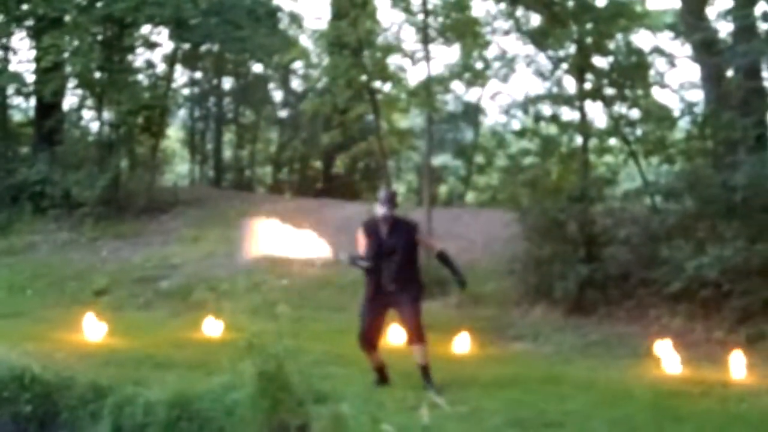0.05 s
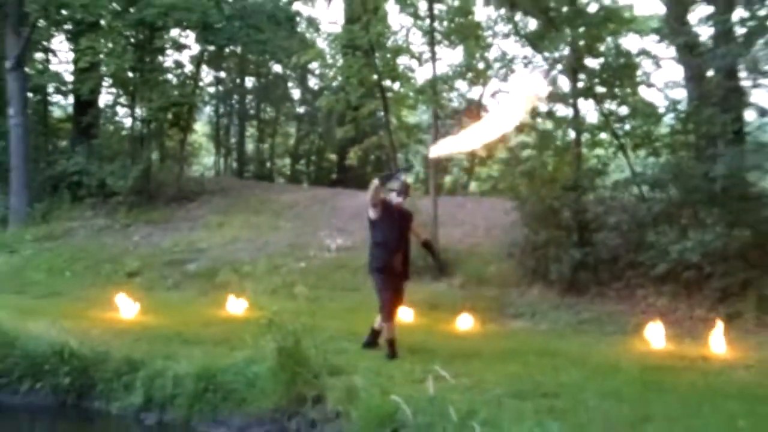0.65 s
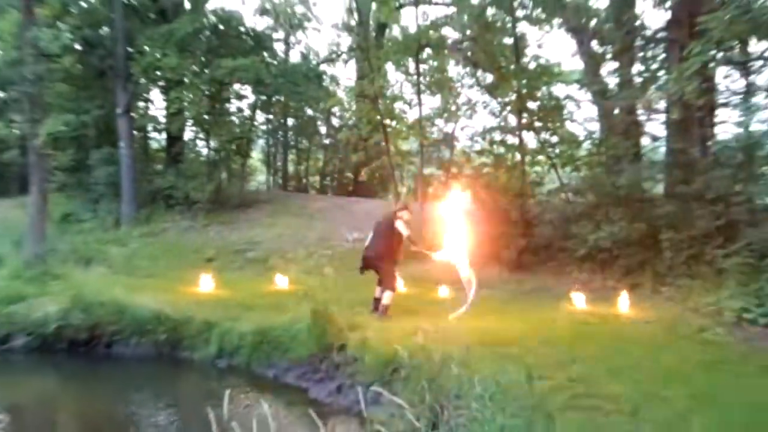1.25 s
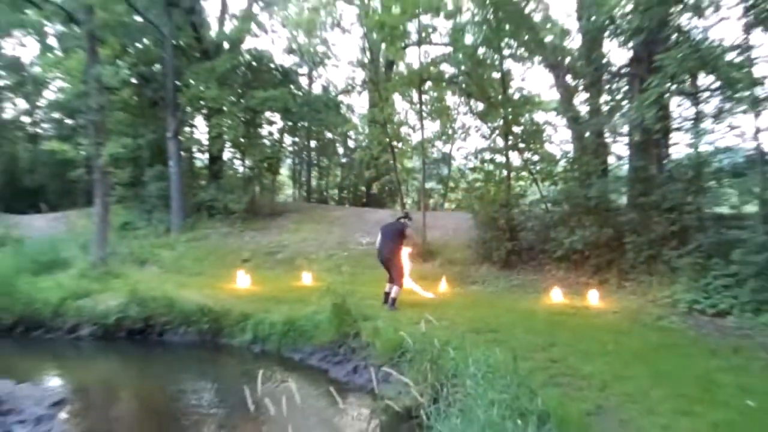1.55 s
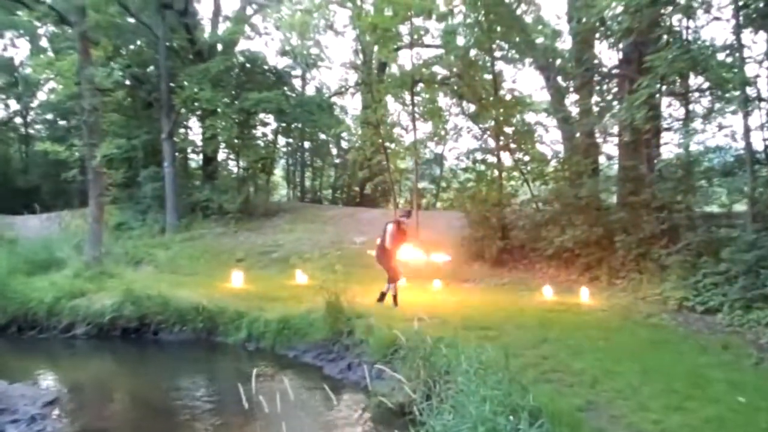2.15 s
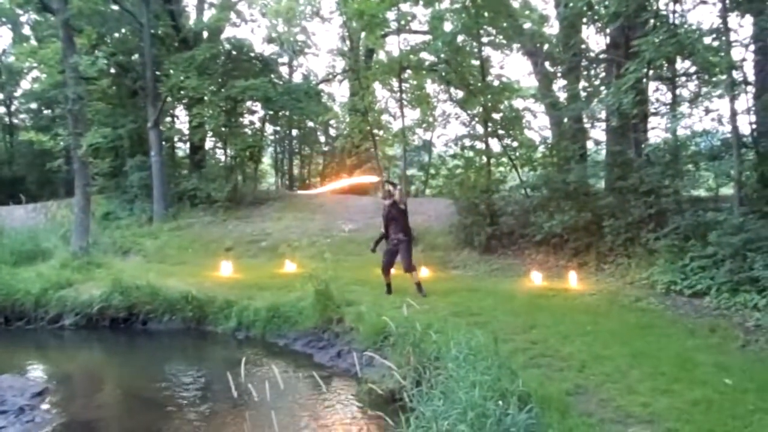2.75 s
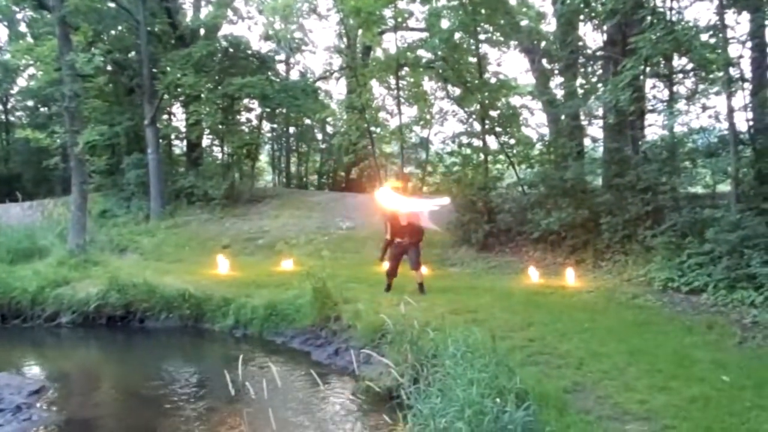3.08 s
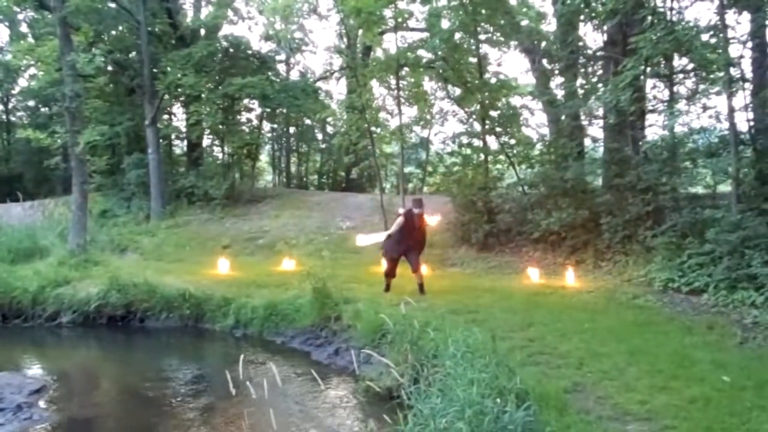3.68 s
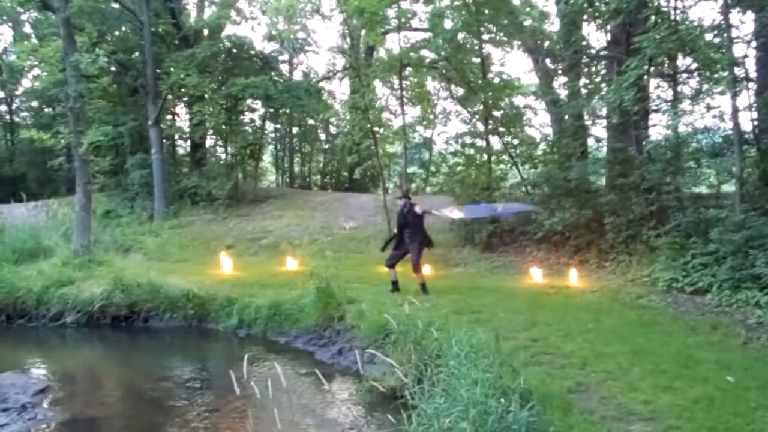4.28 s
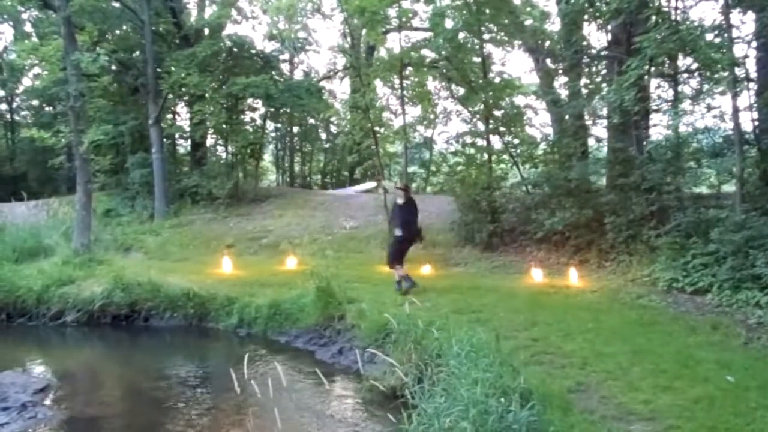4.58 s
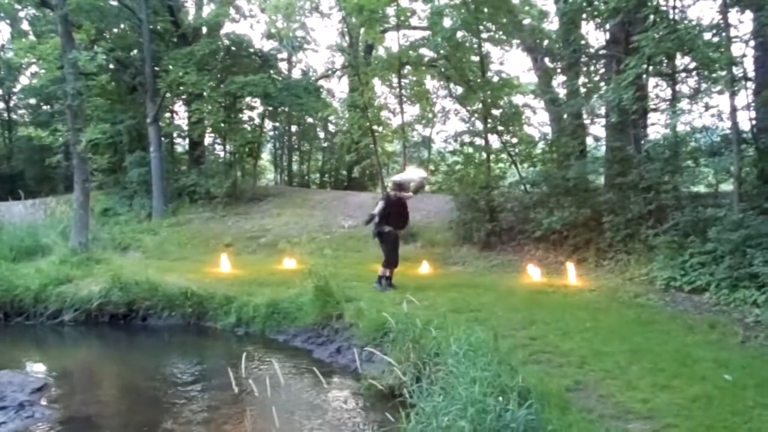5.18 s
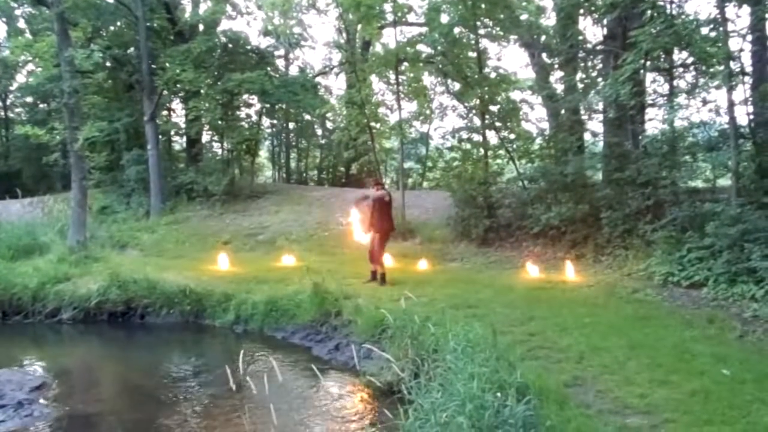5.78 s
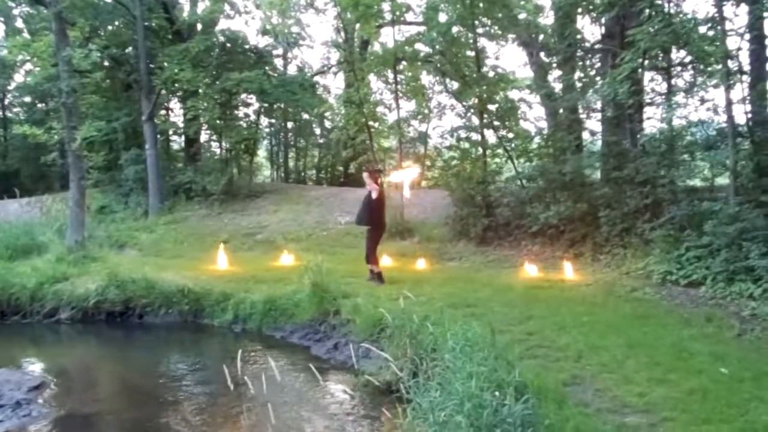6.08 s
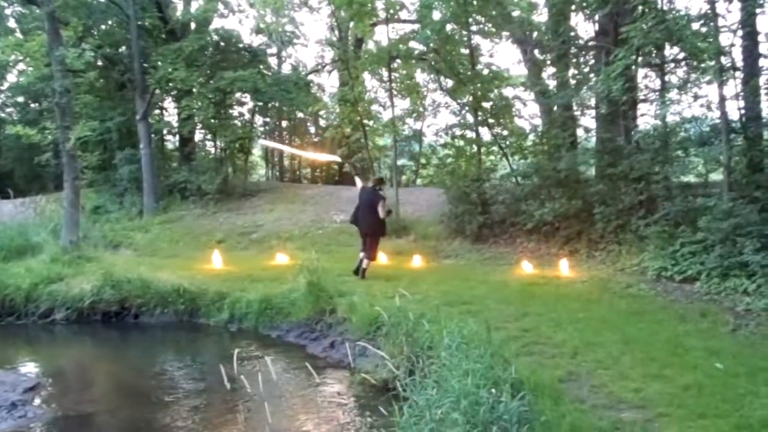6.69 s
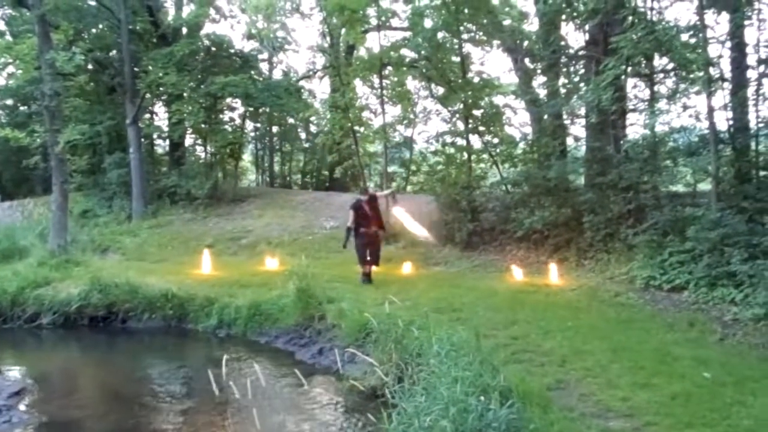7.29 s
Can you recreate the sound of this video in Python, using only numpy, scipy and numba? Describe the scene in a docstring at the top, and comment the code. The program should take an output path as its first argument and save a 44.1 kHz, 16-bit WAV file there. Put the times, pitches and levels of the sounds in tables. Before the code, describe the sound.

A burning whip swings several metres away on a lawn among trees, its flame making soft, fluttering roars and swishes that swell and fade throughout. A camera zoom motor whirrs faintly close by from 0.4 to 1.7 seconds and again briefly just after 2. At about 1.4 seconds a rising whoosh ends in a very loud, bright crack with a low fireball thump and short rumble, echoing off the trees for under a second. A faint snap follows at 2.5. At 3.3 seconds comes a second loud crack, blunter, with another thump and echo. The flame then keeps whooshing, fullest between 4.5 and 5.8 seconds, where another faint snap sounds, and swells softly again around 7 to 7.5. Underneath, a stream gives a very quiet, wide wash, with a few tiny pops and barely audible high falling chirps between about 3 and 5 seconds.

```python
"""A lawn beside a stream, ringed by trees: a burning whip swings some metres from a hand-held camera.
The flame roars, rushes and swishes as the lash drags it through the air. The supersonic tip cracks four
times, twice loudly with a fireball, and the wood scatters each shock. The camera's zoom motor whirrs in
the first seconds; underneath, the stream washes on, with a few faint pops and chirps."""
import sys
import numpy as np
from scipy import signal
from scipy.fft import rfft, irfft
from scipy.io import wavfile
from scipy.ndimage import uniform_filter1d
from numba import njit

SR = 44100
rng = np.random.default_rng(int(sys.argv[2]) if len(sys.argv) > 2 else 0)


def materialize(psi):
    """Save the field psi as 16-bit PCM at rate SR to the path in sys.argv[1].

    A 1-D psi becomes a single channel; in a 2-D psi each row is a channel.
    """
    bounded = np.clip(np.atleast_2d(psi).T, -1, 1)
    quanta = np.round(bounded * 32767).astype(np.int16)
    wavfile.write(sys.argv[1], SR, quanta)


N = 332514

# low rumble of the fireballs and the shaking camera: (frequency [Hz], level [dB])
RUMBLE_COLOUR = [(20, -7), (45, 4.5), (110, 1.5), (230, -9.5), (340, -14), (700, -28.5), (2000, -49)]


def flame():
    """Large eddies roar at a moving pitch, smaller ones rush and swish; all flutter as the flame tears."""
    # body and top of the burning air: (frequency [Hz], level [dB])
    rush_colour = [(400, -27), (510, -10), (620, -2.5), (720, -1.5), (840, -1), (1020, -7), (1300, -15.5),
                   (2500, -39)]
    swish_colour = [(800, -12.5), (1150, 0), (1600, -0.5), (2000, -8), (2700, -7), (3300, -8.5),
                    (4800, -17), (7000, -26.5), (11000, -29.5), (14500, -32.5)]
    rush_db, swish_db = lash_strokes()
    roar_db, roar_hz = flame_billows()
    flutter_db = 0.93 * walk(70)
    damping = 0.82
    eddies = np.array([svf(svf(side, roar_hz, damping), roar_hz, damping)
                       for side in noise(0, wider_db=-5.5)])
    eddies /= np.sqrt(roar_hz)  # even power at any pitch
    roar = eddies / np.std(eddies) * undb(roar_db - 0.18 + flutter_db + 1.5 * walk(35))
    rush = noise(along(rush_colour), wider_db=-8.5) * undb(rush_db - 2.5 + flutter_db + 2.1 * walk(30))
    swish = noise(along(swish_colour), grain_db=1.5, wider_db=-6.5)
    swish *= undb(swish_db - 1.63 + flutter_db + 0.62 * walk(110))
    return roar + rush + swish


def lash_strokes():
    """Rush and swish envelopes in dB: both ride the speed of the lash, and strokes add in power."""
    # swings through the air: (fastest at [s], rise [s], fall [s], rush [dB], swish over rush [dB])
    strokes = [ (0.14, .3, .17, -57.5, -5.5), (0.32, .16, 0.21, -50.5, -5.5), (0.72, 0.16, 0.3, -63, -1.5),
               (1.12, 0.16, 0.15, -58.5, -11), (1.25, 0.035, .1, -47.5, -3), (1.36, 0.064, .12, -46, -4),
               (2.5, 0.1, 0.11, -50.5, -2.5), (2.72, 0.45, 0.37, -60.5, -7), (3.19, 0.057, .08, -52.5, 1.5),
               (3.28, 0.06, 0.035, -46, -2), (3.6, .12, 0.15, -57.5, 2), (4.26, 0.17, 0.13, -62.5, -7),
               (4.48, 0.067, .12, -50.5, 0), (4.69, 0.25, .16, -50, -6), (5.0, 0.2, 0.19, -56, -0.5),
               (5.33, 0.22, 0.066, -55, -7), (5.57, 0.13, 0.26, -53, -2), (5.75, 0.2, 0.083, -50, -11),
               (5.92, 0.12, 0.21, -69.5, -1.5), (6.38, .09, 0.13, -67.5, -5), (6.6, 0.099, .13, -62, 0),
               (6.98, 0.21, 0.26, -61, -8.5), (7.35, 0.15, 0.22, -57.5, -1)]
    rush_power = swish_power = 1e-12
    for s, rise_s, fall_s, rush_db, swish_db in strokes:
        speed = swell(s, rise_s, fall_s)
        rush_power += (undb(rush_db) * speed) ** 2
        swish_power += (undb(rush_db + swish_db) * speed) ** 2
    return 10 * np.log10(rush_power), 10 * np.log10(swish_power)


def flame_billows():
    """Level in dB and centre in Hz of the roar: billows add in power, and the strongest leads the pitch."""
    # fire swelling behind the lash: (fullest at [s], rise [s], fall [s], roar [dB], centre [Hz])
    billows = [ (0.21, .33, .13, -54, 345), (0.391, .12, .19, -50.5, 200), (1.06, .27, 0.19, -56, 305.7),
               (1.27, 0.067, .1, -49, 231.5), (1.355, 0.03, .09, -39, 229.1), (1.58, .1, .25, -57, 195),
               (2.46, .16, .2, -55.5, 235), (2.9, .25, .38, -59, 304.3), (3.285, 0.069, .05, -42.5, 290),
               (3.39, .06, .16, -55.5, 195), (4.38, .32, .4, -62.5, 205), (4.68, .13, 0.23, -52, 368),
               (5.29, .22, .13, -52, 337), (5.83, .3, 0.19, -58.5, 220), (6.93, 0.45, 0.24, -59.5, 340),
               (7.34, .1, .22, -57.5, 212)]
    burn_db, burn_hz = -73.5, 220  # the quiet roar between billows
    power = undb(burn_db) ** 2
    weighted_hz = power * burn_hz
    for s, rise_s, fall_s, roar_db, roar_hz in billows:
        billow = (undb(roar_db) * swell(s, rise_s, fall_s)) ** 2
        power += billow
        weighted_hz += billow * roar_hz
    return 10 * np.log10(power), weighted_hz / power


def whip_cracks():
    """Each crack is a faint hiss, a shock and its scatter; a sharper one is brighter."""
    # (time [s], shock [dB], shock length [ms], knock [dB], tip burst [dB], ground lag [ms],
    #  ground bounce [gain], near scatter [dB], scatter rise [s], far scatter [dB], sharpness [0-1])
    cracks = [ (1.3665, -3.5, 0.21, -15.5, -8, 2.28, 0.53, -11.5, 0.012, -28, 1),
              (2.496, -38, 0.26, -56, -49, 2.5, 0.79, -50.5, 0.0075, -68, 0.18),
              (3.289, -4.5, .62, -25.5, -11, 2.45, 0.82, -18.5, 0.00068, -25.5, 0.29),
              (5.7629, -36, 0.17, -59.5, -46, 2.1, 0.76, -51, 0.01, -57.5, 0.6)]
    # tone of a sharp and of a blunt crack: (frequency [Hz], level [dB])
    sharp_colour = [(60, -7.5), (200, -4.5), (400, -16), (800, -9.5), (1400, -5.5), (2700, -3),
                    (5000, -3.5), (8000, -1), (13000, -3)]
    blunt_colour = [(60, -15.5), (170, -13.5), (430, -7), (700, -2), (1100, 0), (1700, 1.5), (2500, 4),
                    (3800, 0.5), (5800, -11.5), (8000, -13.5), (13000, -17.5)]
    out = np.zeros((2, N))
    for s, shock_db, length_ms, knock_db, burst_db, lag_ms, bounce, near_db, rise_s, far_db, sharp in cracks:
        colour_db = sharp * along(sharp_colour, SR) + (1 - sharp) * along(blunt_colour, SR)
        add(out, s - 1, lead_in_hiss(burst_db - 20, colour_db))
        add(out, s, shock(shock_db, length_ms, knock_db, burst_db, lag_ms, bounce, colour_db))
        add(out, s, wood_scatter(near_db, rise_s, far_db, colour_db))
    return out


def lead_in_hiss(db, colour_db):
    """A faint hiss swells in the last milliseconds before each crack."""
    return undb(db) * noise(colour_db, SR) * fade(np.arange(SR)[::-1] / SR, t60=0.016)


def shock(shock_db, length_ms, knock_db, burst_db, lag_ms, bounce, colour_db):
    """The supersonic tip fires an N-wave and a ragged burst; the lawn bounces the hit back, duller."""
    ring_hz, ring_width_hz, ring_gain = 865, 150, 0.9  # a brief ring after the hit
    t = np.arange(SR) / SR
    burst = undb(burst_db) * noise(colour_db, SR, wider_db=0.5) * fade(t, t60=0.0092)
    knock = undb(knock_db) * n_wave(t, length_ms=1.1)  # slower wave from the thick of the lash
    direct = undb(shock_db) * n_wave(t, length_ms) + knock + burst
    direct += ring_gain * signal.lfilter(*signal.iirpeak(ring_hz, ring_hz / ring_width_hz, fs=SR), direct)
    ground = signal.sosfilt(signal.butter(1, 8000, fs=SR, output="sos"), direct)
    return direct + bounce * np.roll(ground, int(lag_ms * SR / 1000), axis=1)


def n_wave(t, length_ms):
    """Pressure jumps up, falls evenly through zero and jumps back."""
    phase = 1000 * t / length_ms
    inside = phase < 1
    ramp = 1 - 2 * phase
    return (ramp - ramp[inside].mean()) * inside


def wood_scatter(near_db, rise_s, far_db, colour_db):
    """Grass and bushes scatter the shock at once; trunks answer for longer, with a bright tail."""
    # stereo width of the tail, narrow mids and wide treble: (frequency [Hz], side minus mid [dB])
    scatter_width = [(60, -25.5), (300, -21.5), (800, -24.5), (1500, -28.5), (3000, -18), (5500, -8),
                     (9000, -6.5), (13000, 1.5)]
    # decay among the trees: (frequency [Hz], t60 [s])
    wood_decay = [(150, 0.58), (800, 0.64), (2500, 0.93), (5000, 0.71), (9000, 0.77), (14000, .54)]
    t = np.arange(SR) / SR
    near = noise(colour_db, SR, grain_db=2.5, width=scatter_width)
    near *= fade(t, t60=0.28) * (1 - np.exp(-t / rise_s))
    trunks = rfft(noise(colour_db, SR, grain_db=3.5, width=scatter_width))
    octave = np.clip(np.log2(np.arange(SR // 2 + 1) / 110 + 1e-9), 0, 7)  # octaves above 110 Hz
    t60 = along(wood_decay, SR)
    far = np.zeros((2, SR))
    for k in range(8):
        band = np.maximum(1 - abs(octave - k), 0)
        far += irfft(trunks * band, SR) * fade(t, t60[110 * 2 ** k])
    far *= 1 - np.exp(-t / 0.049)
    edge_db = 1.7 * np.exp(-((t - 0.2) / 0.033) ** 2)  # a soft swell back from the edge of the wood
    return undb(near_db) * near + undb(far_db + edge_db) * far


def fireballs():
    """Fuel flung off the lash flares up: one slow pressure swing inside a short rumble."""
    # (time [s], thump [dB], thump pitch [Hz], rumble [dB], rumble t60 [s])
    flares = [(1.367, -16.5, 82.8, -34, .45), (3.295, -32, 87, -43.5, 0.17)]
    lead_s = 0.5
    out = np.zeros((2, N))
    t = np.arange(SR) / SR - lead_s
    for s, thump_db, hz, rumble_db, t60 in flares:
        spread = (np.pi * hz * t) ** 2
        thump = undb(thump_db) * (1 - 2 * spread) * np.exp(-spread)
        envelope = fade(abs(t), np.where(t < 0, 0.25, t60))
        rumble = undb(rumble_db) * envelope * noise(along(RUMBLE_COLOUR, SR), SR, wider_db=-5)
        add(out, s - lead_s, thump + rumble)
    return out


def zoom_motor():
    """The lens drive hisses through the resonances of the camera body and shakes it a little."""
    # resonances of the body: (frequency [Hz], level [dB])
    whirr_colour = [(1200, -17.5), (2000, -8.5), (2550, 2), (2900, -4.5), (3250, 5.5), (3800, -6),
                    (4500, -2), (5600, -3.5), (6700, -6.5), (8000, 1), (9200, -4.5), (10600, -0.5),
                    (14300, -0.5)]
    # (start [s], stop [s], spin-up [s], run-down t60 [s], whirr [dB], rumble [dB], sag [dB/s])
    runs = [(0.41, 1.72, 0.08, 1.1, -57.5, -57, 0.5), (2.054, 2.318, .012, .03, -58.5, -60.5, -1)]
    linger_s = 0.5  # the shaking outlasts the whirr
    t = np.arange(N) / SR
    whirr_gain = rumble_gain = 0
    for start, stop, spin_up_s, t60, whirr_db, rumble_db, sag_db in runs:
        drive = np.clip((t - start) / spin_up_s, 0, 1) * undb(-sag_db * (t - start))
        since_stop = np.maximum(t - stop, 0)
        whirr_gain += undb(whirr_db) * drive * fade(since_stop, t60)
        rumble_gain += undb(rumble_db) * drive * fade(since_stop, t60 + linger_s)
    whirr = noise(along(whirr_colour), grain_db=5.5, wider_db=5) * whirr_gain * undb(1.3 * walk(60))
    rumble = noise(along(RUMBLE_COLOUR), wider_db=9) * rumble_gain * undb(1.3 * walk(20))
    return whirr + rumble


def stream():
    """A soft, wide wash of tiny splashes; its level is turned down briefly after the first crack."""
    # tone of the water: (frequency [Hz], level [dB])
    water_colour = [(25, -14), (80, 1.5), (190, -0.5), (400, -4), (700, -2), (1100, -7.5), (2000, -14.5),
                    (3100, -19.5), (4500, -24.5), (7500, -31.5), (12000, -26.5)]
    bed_db = -62.5
    dip_db = -5 * swell(1.7, rise_s=0.5, fall_s=0.22)
    return noise(along(water_colour), grain_db=3.5, wider_db=8) * undb(bed_db + dip_db + 0.89 * walk(26))


def pops():
    """Small pitched ticks of noise that die within milliseconds."""
    # (time [s], peak [dB], pitch [Hz], t60 [s])
    ticks = [(0.136, -40.5, 2110, 0.018), (.779, -44, 10000, .02), (3.052, -51.5, 4020, .015),
             (7.194, -59, 7960, 0.016)]
    out = np.zeros((2, N))
    t = np.arange(SR) / SR
    for s, db, hz, t60 in ticks:
        colour = [(hz / 4, -50), (hz / 2, -17), (hz, 0), (hz * 2, -22), (hz * 4, -45)]
        pop = noise(along(colour, SR), SR) * fade(t, t60)
        add(out, s, undb(db) * pop / abs(pop).max())
    return out


def chirps():
    """Faint, high, narrow hisses that glide down."""
    # (middle [s], level [dB], start [Hz], end [Hz], length [s], bandwidth [Hz])
    glides = [(2.776, -76, 9960, 8300, .05, 3500), (3.946, -72, 6830, 5940, 0.072, 2800),
              (4.222, -69.5, 8700, 6210, 0.13, 2300), (4.93, -73, 10530, 9630, 0.049, 1090)]
    out = np.zeros((2, N))
    for s, db, start_hz, end_hz, length_s, width_hz in glides:
        size = int(length_s * SR)
        lowpass = signal.butter(2, width_hz / 2, fs=SR, output="sos")
        rasp = signal.sosfilt(lowpass, rng.standard_normal(SR))[:size]
        tone = np.sqrt(2) * np.sin(2 * np.pi * np.cumsum(np.linspace(start_hz, end_hz, size)) / SR)
        add(out, s - length_s / 2, undb(db) * np.hanning(size) * tone * rasp / np.std(rasp))
    return out


def noise(colour_db, size=N, grain_db=0, wider_db=0, width=None):
    """Coloured stereo noise with a mid of rms 1; grain lets single impulses stand out."""
    # usual stereo width, wider in the treble: (frequency [Hz], side minus mid [dB])
    usual_width = [(60, -23.5), (170, -24), (350, -17.5), (800, -21.5), (1400, -16), (2600, -12),
                   (5000, -8), (8000, -5), (13000, -8)]
    white = rng.standard_normal((2, size))
    mid, side = rfft(white * undb(grain_db * rng.standard_normal(size)))
    side *= undb(along(width or usual_width, size) + wider_db)
    stereo = irfft(np.array([mid + side, mid - side]) * undb(colour_db), size)
    return stereo / np.std(stereo.mean(axis=0))


def undb(db):
    """Decibels to gain."""
    return np.exp(np.asarray(db) * np.log(10) / 20)


def along(points, size=N):
    """A (frequency [Hz], value) curve read at every bin of a spectrum."""
    hz, value = np.transpose(points)
    return np.interp(np.log(np.arange(size // 2 + 1) * SR / size + 1), np.log(hz), value)


def walk(rate):
    """Random levels held 1 / rate s and slewed twice; spread near 1."""
    hold = max(int(SR / rate), 1)
    steps = np.repeat(rng.standard_normal(N // hold + 1), hold)
    return 1.3 * uniform_filter1d(uniform_filter1d(steps, hold), hold)[:N]


def swell(s, rise_s, fall_s):
    """An envelope that rises to 1 at time s and falls again."""
    roundness = 1.6  # 1 is a pointed peak, 2 a bell
    t = np.arange(N) / SR - s
    return np.exp(-abs(t / np.where(t < 0, rise_s, fall_s)) ** roundness)


def fade(t, t60):
    """Exponential decay by 60 dB in t60 seconds."""
    return np.exp(-np.log(1000) * t / t60)


def add(out, s, sound):
    """Mix a sound in at time s."""
    i = int(s * SR)
    out[:, i:i + sound.shape[-1]] += sound[..., :N - i]


@njit
def svf(x, hz, damping):
    """State-variable band-pass with a moving centre."""
    y = np.empty(len(x))
    band_state = low_state = 0.0
    for i in range(len(x)):
        g = np.tan(np.pi * hz[i] / SR)
        band = (band_state + g * (x[i] - low_state)) / (1 + g * (g + damping))
        band_state = 2 * band - band_state
        low_state += 2 * g * band
        y[i] = damping * band
    return y


def scene():
    """Whip and fire in front; motor, water and small sounds behind."""
    return flame() + whip_cracks() + fireballs() + zoom_motor() + stream() + pops() + chirps()


def record(dry):
    """A little hollow, brighter and earlier on the right; the camera rounds peaks and cuts the top."""
    # tone of everything at the camera: (frequency [Hz], gain [dB])
    hollow = [(20, -3.5), (40, -0.5), (110, 0), (170, 2.5), (290, -2.5), (380, 0), (500, -2.5), (620, 0.9),
              (820, 0.5), (1020, 0), (1500, 1.07), (2000, 1), (2500, 1), (12500, 1.5), (14500, -2)]
    # stereo tilt: (frequency [Hz], right minus left [dB])
    right_lift = [(100, -0.5), (1000, -0.5), (4500, 0.1), (8000, 2.5), (13000, 2)]
    left_lag_ms, top_hz = 0.008, 14150
    lift_db = along(right_lift) / 2
    spectra = rfft(dry) * undb(along(hollow) + np.array([-lift_db, lift_db]))
    hz = np.arange(N // 2 + 1) * SR / N
    spectra[0] *= np.exp(-2j * np.pi * hz * left_lag_ms / 1000)
    rounded = np.tanh(irfft(spectra, N))
    return signal.sosfilt(signal.ellip(10, 0.2, 80, top_hz, fs=SR, output="sos"), rounded)


dry = scene()
out = record(dry)
materialize(out)
```